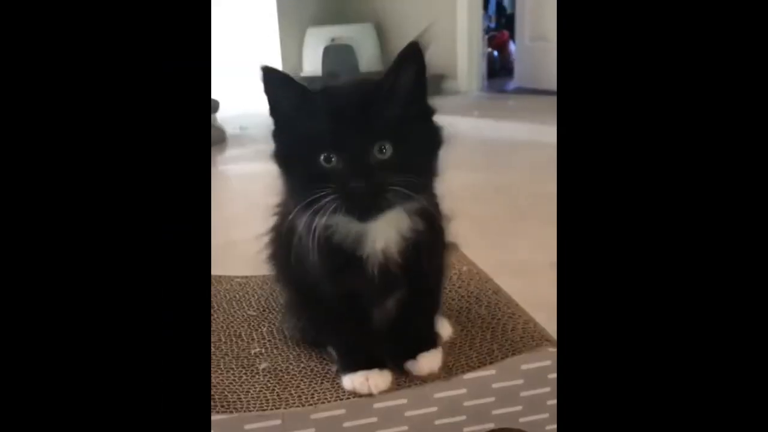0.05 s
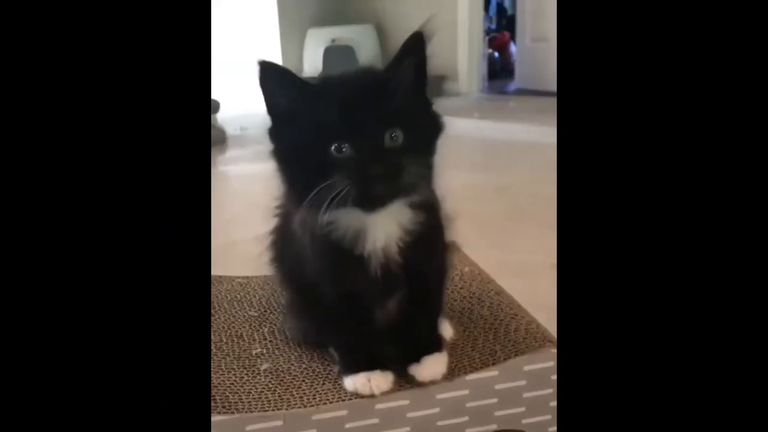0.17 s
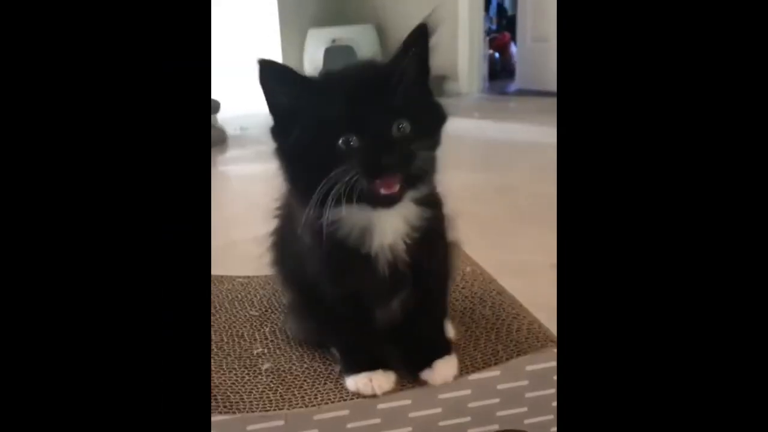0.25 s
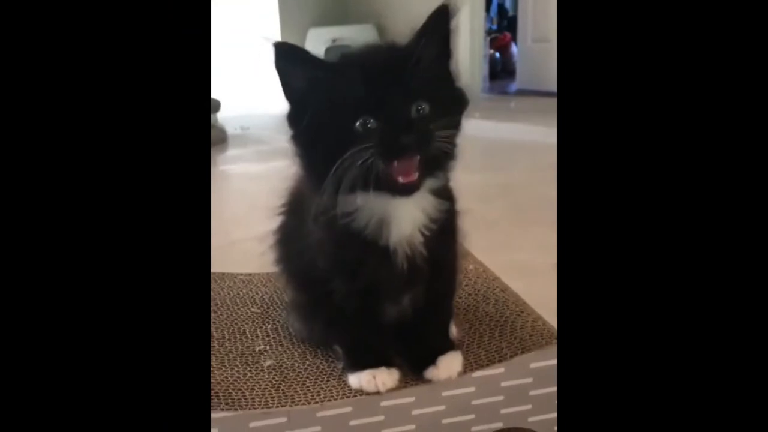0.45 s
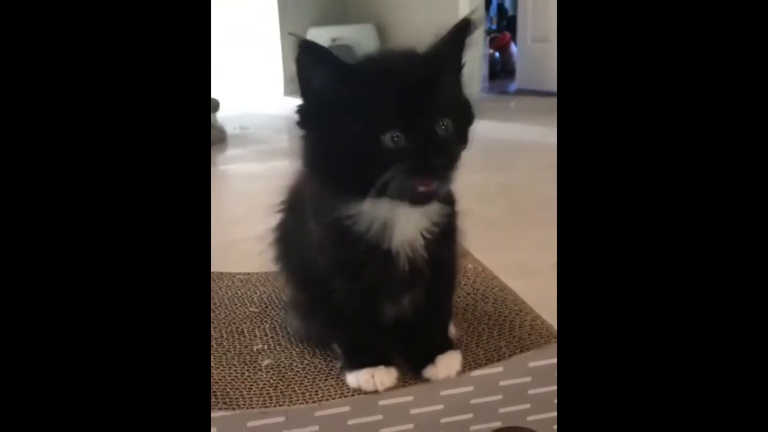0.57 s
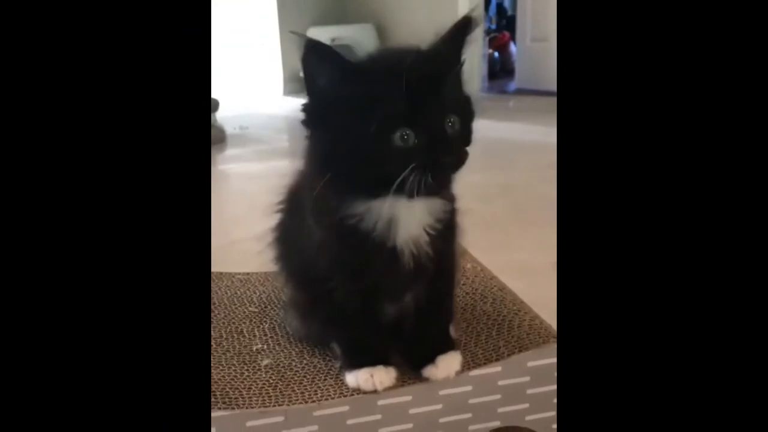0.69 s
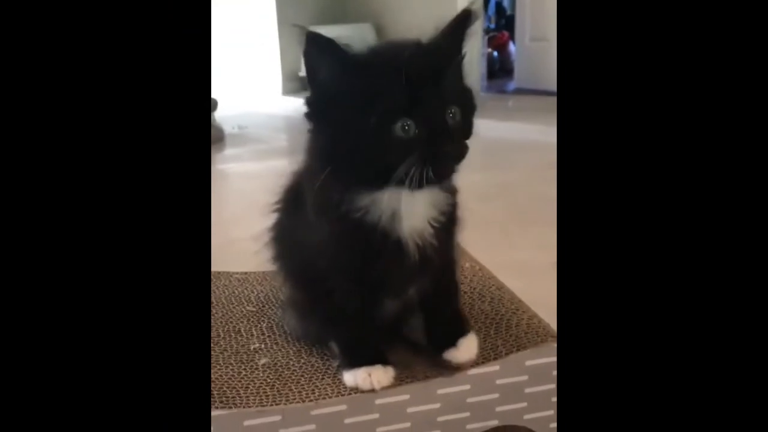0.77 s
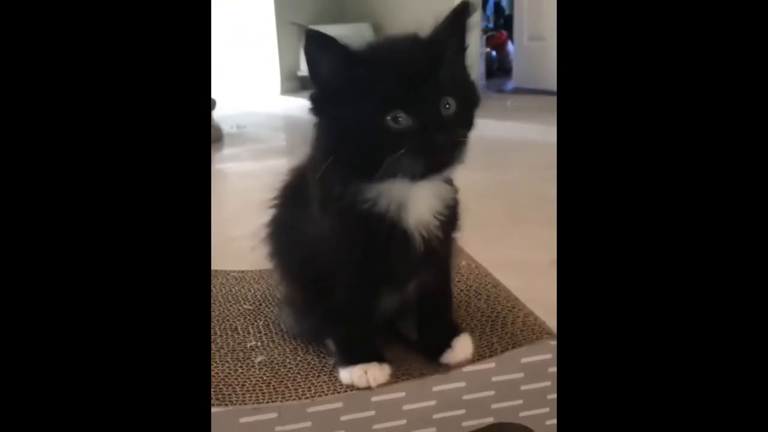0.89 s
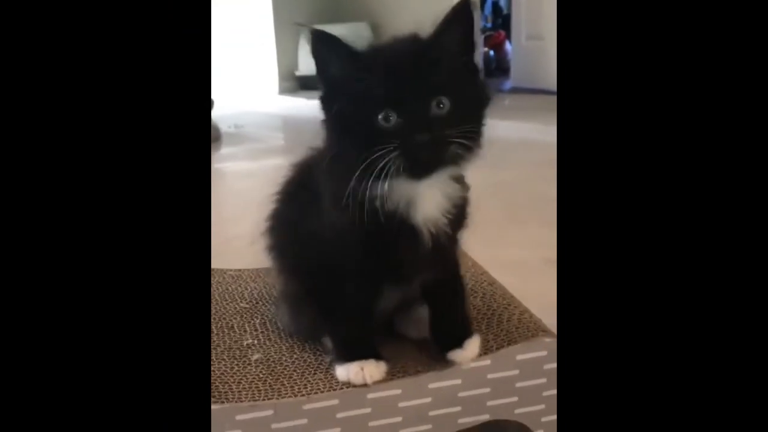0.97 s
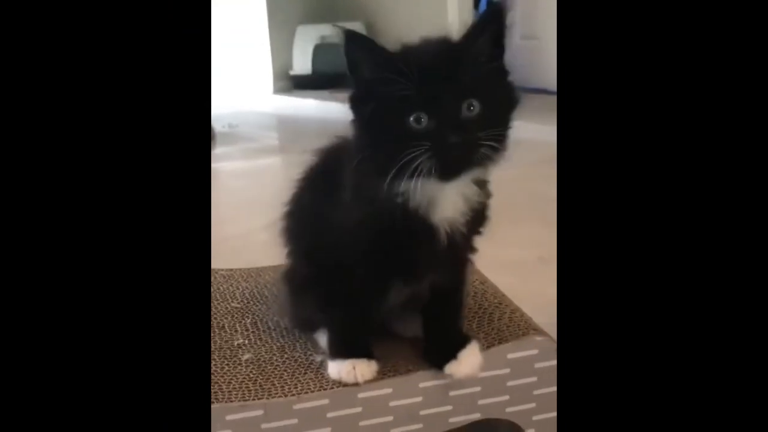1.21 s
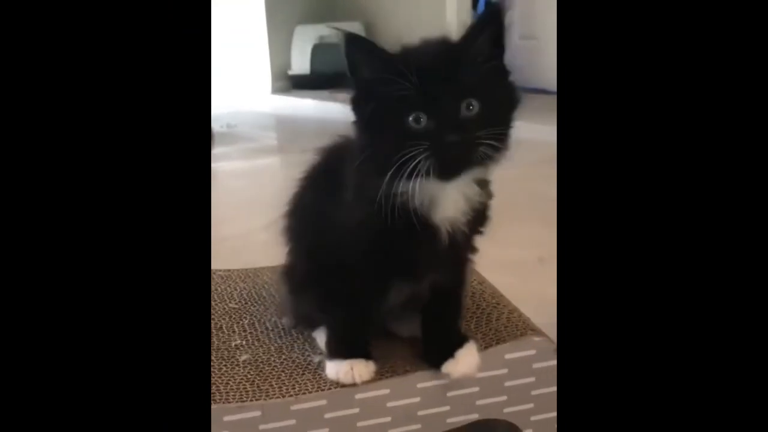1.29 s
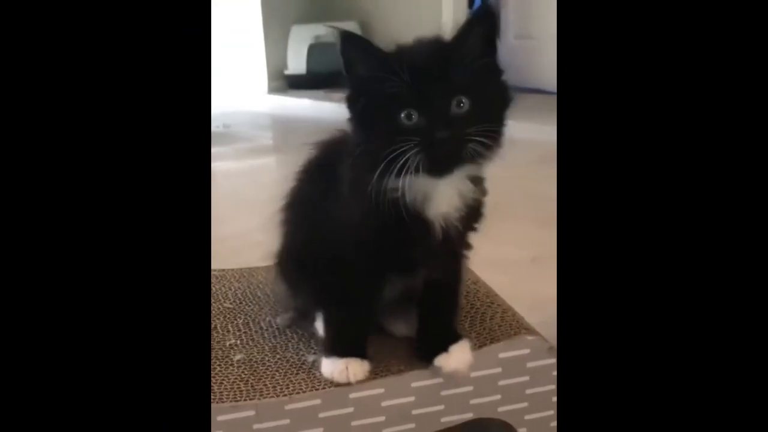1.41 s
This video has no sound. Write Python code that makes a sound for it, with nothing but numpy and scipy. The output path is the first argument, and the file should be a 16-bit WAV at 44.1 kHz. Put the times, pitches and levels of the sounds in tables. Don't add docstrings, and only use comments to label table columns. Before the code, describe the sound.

A small kitten close by gives one short, thin, high meow in a quiet room.

```python
import sys
import numpy as np
from scipy import signal
from scipy.fft import rfft, irfft
from scipy.io import wavfile
from scipy.ndimage import uniform_filter1d

SR = 44100
rng = np.random.default_rng(int(sys.argv[2]) if len(sys.argv) > 2 else 0)


def dump_mix(stems):
    frames = np.atleast_2d(stems).T
    limited = np.clip(frames, -1, 1)
    pcm = np.round(limited * 32767).astype(np.int16)
    wavfile.write(sys.argv[1], SR, pcm)


def volts_from_db(level):
    exponent = np.asarray(level, float) / 20
    return 10 ** exponent


N = 63945
T = np.arange(N) / SR

# (frequency [Hz], level [dB per Hz])
HUSH_SPECTRUM = [(22, -38), (50, -4), (70, -4.5), (160, -3.5), (500, -13.5), (1300, -18.5), (4000, -33.5),
                 (14000, -38.5)]
# (time [s], level [dB])
MOTOR_LEVEL = [(0.0, -69.5), (0.242, -55), (0.318, -59.5), (0.37, -54), (0.472, -62), (0.528, -55),
               (0.67, -70), (0.722, -64), (0.96, -58.5), (1.032, -60.5), (1.106, -57), (1.238, -63),
               (1.276, -74), (1.372, -70), (1.404, -65.5), (1.45, -67)]
# (frequency [Hz], width [Hz], level [dB])
ROOM_MODES = [(77.8, 12, -68.5), (148.7, 10, -73), (99.48, 5.3, -67.5)]
# (time [s], peak level [dB], centre [Hz], width [Hz], decay time [ms])
MOUTH_CLICKS = [(.4105, -52, 975, 249, 0.6), (.4095, -64.5, 2540, 600, 1.7),
                (.4292, -54, 11500, 15900, 1.8), (.4365, -53.5, 3170, 2500, 1.6),
                (.4365, -61, 6700, 1500, 2.2), (.4455, -52.5, 3600, 1500, 2.4),
                (.4455, -61, 8900, 9000, 12), (.457, -48.5, 5970, 1200, 2.8), (.457, -49.5, 3330, 1550, 5),
                (.4585, -56.5, 11500, 4000, 5.8), (1.158, -50, 1020, 370, 1.5),
                (1.157, -58, 2730, 691.3, 5.1)]
# (time [s], pitch
# [Hz], effort [dB], tilt [dB per octave], mouth opening [0-1])
SQUEAK_GESTURE = [
    (.446, 1050, -62, -4, .3),
    (.4495, 1090, -43, -4, .3),
    (.456, 1190, -36, -5, .3),
    (.4595, 1150, -52, -4, .3),
    (.462, 960, -56, -1, .3),
]
MEOW_GESTURE = [
    (.466, 974, -44.5, 1.4, 0.47),
    (.49, 1026, -45, 2.1, 0.6),
    (0.511, 1025, -45.5, 1.2, 0.9),
    (.545, 1120, -47, 2.5, 0.83),
    (0.598, 1195, -46.5, 0.83, 1),
    (0.763, 1176, -40.5, 0.37, 1),
    (0.851, 1061, -38, -0.77, .5),
    (0.955, 951.5, -42.5, 0.6, 0.46),
    (1.022, 849.6, -44.5, 0.2, 0.37),
                (1.099, 784.3, -44.5, 0.51, 0.33),
    (1.125, 759.3, -45, 0.37, 0.054),
    (1.145, 715, -46.5, 0.69, 0.018),
    (1.156, 736.6, -47.5, 0.92, .02),
                (1.161, 770, -49, -6, .02),
    (1.174, 870, -55, -4, .1),
    (1.179, 890, -75, -4, .1),
]
# (frequency [Hz], width [Hz], level when shut [dB], level gained when open [dB])
THROAT_RESONANCES = [(936.6, 220, 3.5, -4.5), (1706, 426, -22, 10.5), (2390, 344, -22, 9.5),
                     (2840, 534, -16.5, -9.5), (3604, 432, -21.5, 2.9), (4800, 470, -39, 9.5),
                     (5126, 210, -44.5, 15.5), (5828, 884, -26.5, 4.4), (6795, 245, -33, -3),
                     (7750, 220, -43, 8.5), (8590, 160, -30.5, -12.5), (9060, 560, -41.5, 2),
                     (11500, 870, -46, -14)]
# (time [s], level [dB], half length [s])
PAW_BRUSHES = [
    (0.97, -76.5, 0.056),
    (1.117, -85, .015),
    (1.246, -75.5, 0.017),
    (1.317, -81, 0.019),
    (1.346, -74, 0.0061),
]
# (frequency [Hz], level [dB per Hz])
BRUSH_SPECTRUM = [(3000, -2), (6000, -8), (8500, -1), (12500, 3), (15000, -9)]


def evened(x):
    return x / np.sqrt(np.mean(x ** 2) + 1e-20)


def coloured(x, points):
    table_hz, table_db = np.transpose(points)
    hz = np.fft.rfftfreq(len(x), 1 / SR)
    gain_db = np.interp(np.log(hz + 1), np.log(table_hz + 1), table_db)
    return irfft(rfft(x) * volts_from_db(gain_db), len(x))


def peak(f, hz, width):
    return 1j * f * width / (hz ** 2 - f ** 2 + 1j * f * width)


def drift(hz):
    rates = np.geomspace(hz / 8, hz, num=16)
    return evened(sum(np.sin(2 * np.pi * (rate * T + rng.random())) for rate in rates))


def hush():
    noise = evened(coloured(rng.standard_normal(N), HUSH_SPECTRUM))
    return volts_from_db(-64) * noise * volts_from_db(0.79 * drift(hz=6.1))


def hum():
    motor_hz, waver_hz = 98.8, 0.26
    s, db = np.transpose(MOTOR_LEVEL)
    phase = 2 * np.pi * np.cumsum(motor_hz + waver_hz * drift(hz=15)) / SR
    out = np.sqrt(2) * volts_from_db(np.interp(T, s, db)) * np.sin(phase)
    f = np.fft.rfftfreq(N, 1 / SR)
    for hz, width, mode_db in ROOM_MODES:
        mode = irfft(rfft(rng.standard_normal(N)) * peak(f, hz, width) ** 2, N)
        out = out + volts_from_db(mode_db) * evened(mode)
    return out


def clicks():
    size, attack_s = 1024, 0.00013
    out, t = np.zeros(N), np.arange(size) / SR
    f = np.fft.rfftfreq(size, 1 / SR)
    for s, db, hz, width, ms in MOUTH_CLICKS:
        envelope = np.minimum(t / attack_s, 1) * np.exp(-t / ms * 1000)
        burst = rng.standard_normal(size) * envelope
        snap = irfft(rfft(burst) * peak(f, hz, width) ** 2)
        out[round(s * SR):][:size] += volts_from_db(db) * snap / abs(snap).max()
    return out


def room(x):
    t60_s, gap_s, dull_hz = 0.42, .004, 4840
    t = np.arange(SR // 2) / SR
    tail = rng.standard_normal(len(t)) * volts_from_db(-60 * t / t60_s) * (t > gap_s)
    tail = signal.lfilter(*signal.butter(1, dull_hz, fs=SR), tail)
    return signal.fftconvolve(x, tail / np.linalg.norm(tail))[:N]


def throat(f, mouth):
    gain = 0
    for k, (hz, width, shut_db, open_db) in enumerate(THROAT_RESONANCES):
        gain = gain + (-1) ** k * volts_from_db(shut_db + open_db * mouth) * peak(f, hz, width) ** 2
    return gain


def kitten():
    wobble, shimmer_db = .0055, .6
    breath_db, breath_tilt_db, air_db = -42, 1, -43
    s, *columns = np.transpose(SQUEAK_GESTURE + MEOW_GESTURE)
    hz, effort_db, tilt_db, mouth = (uniform_filter1d(np.interp(T, s, c), size=70) for c in columns)
    hz = hz * (1 + wobble * drift(hz=60.02))

    k = np.arange(1, 15)[:, None]
    shimmer = np.array([drift(hz=50.29) for _ in k]) * np.sqrt(k)
    source = np.sqrt(2) * volts_from_db(tilt_db * np.log2(k) + shimmer_db * shimmer)
    gains = source * throat(k * hz, mouth)
    tone = (gains * np.exp(2j * np.pi * k * np.cumsum(hz) / SR)).real.sum(0)

    f = np.fft.rfftfreq(N, 1 / SR)
    breath_gain = abs(throat(f, 0.67)) * volts_from_db(breath_tilt_db * np.log2(f / 1000 + 0.27))
    breath = evened(irfft(rfft(rng.standard_normal(N)) * breath_gain, N))
    air = evened(coloured(rng.standard_normal(N), BRUSH_SPECTRUM))
    voice = tone + volts_from_db(breath_db) * breath + volts_from_db(air_db) * air
    return voice * volts_from_db(effort_db) * (T > s[0]) * (T < s[-1])


def rustles():
    level = sum(volts_from_db(db) * np.exp(-((T - s) / half_s) ** 2) for s, db, half_s in PAW_BRUSHES)
    grains = rng.standard_normal(N) * volts_from_db(4.0 * drift(hz=200))
    return level * evened(coloured(grains, BRUSH_SPECTRUM))


def thinned(x):
    mask_db, mask_tilt_db = -34.5, 2.0
    gap_share, mottle_db, left_gain = .09, 2.2, .07
    f, _, z = signal.stft(x, SR, nperseg=1024, noverlap=768)
    hz = f[:-1].reshape(64, 8).mean(1)[:, None]
    power = (abs(z[:-1]) ** 2).reshape(64, 8, -1).mean(1)
    power = uniform_filter1d(power, size=5, axis=1)
    usual = np.median(power, axis=1)[:, None]

    below = np.maximum(np.roll(power, 1, axis=0), np.roll(power, 2, axis=0))
    threshold = np.sqrt(below) * volts_from_db(mask_db + mask_tilt_db * np.log2(hz / 1000))
    masked = (np.sqrt(power) < threshold) & (hz > 1200)

    chance = uniform_filter1d(rng.standard_normal(power.shape), size=9, axis=1)
    gaps = (chance < np.quantile(chance, gap_share)) & (power < 2 * usual) & (hz > 4500)
    mottle = volts_from_db(mottle_db * evened(chance) * (hz > 4500) * (power < 3 * usual))
    keep = np.repeat(np.where(masked | gaps, left_gain, mottle), 8, axis=0)
    keep = np.r_[keep, keep[-1:]]
    return signal.istft(z * keep, SR, nperseg=1024, noverlap=768)[1][:N]


def scene():
    cat = kitten() + clicks()
    return (cat + volts_from_db(-22) * room(cat) + rustles() + hum() + hush())[None]


def band_limit(x):
    return signal.sosfilt(signal.butter(12, 14030, fs=SR, output="sos"), x)


def record(dry):
    mix = thinned(dry[0])[None]
    return band_limit(mix)


dry = scene()
out = record(dry)
dump_mix(out)
```